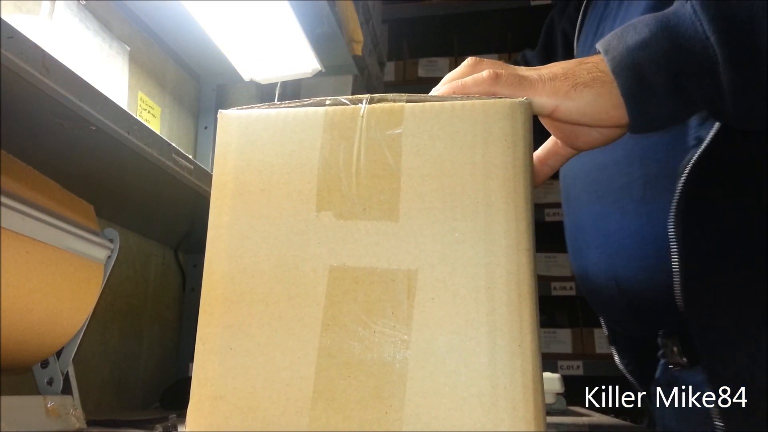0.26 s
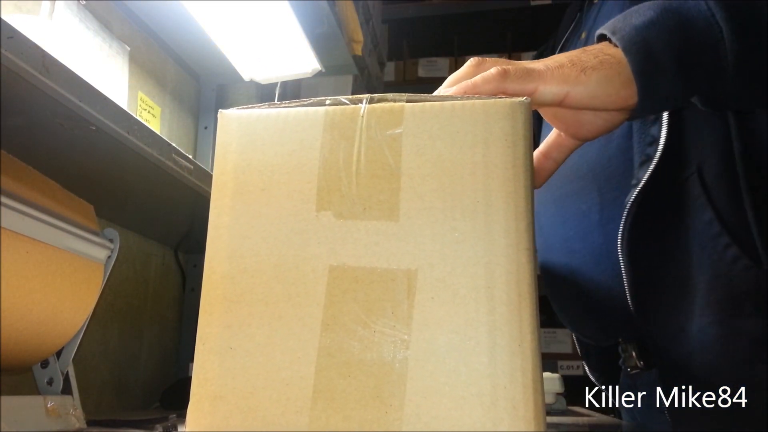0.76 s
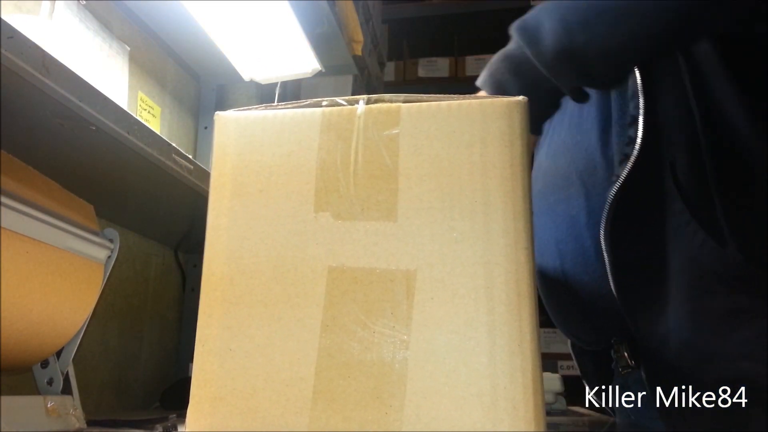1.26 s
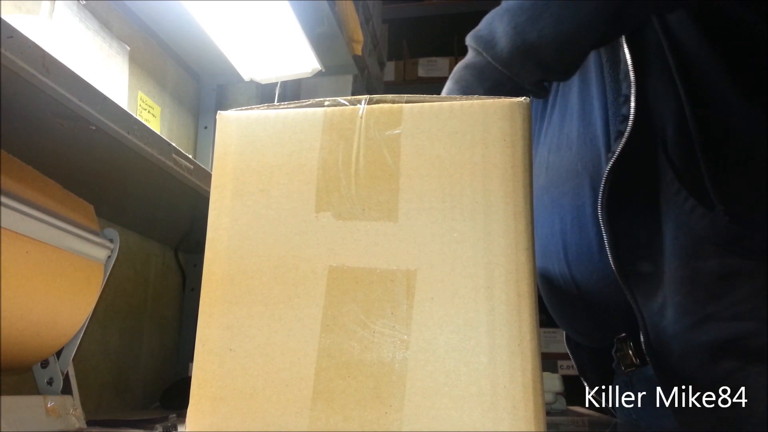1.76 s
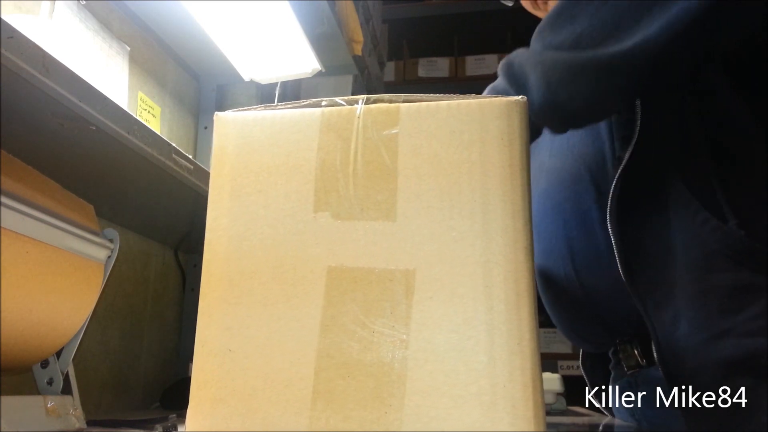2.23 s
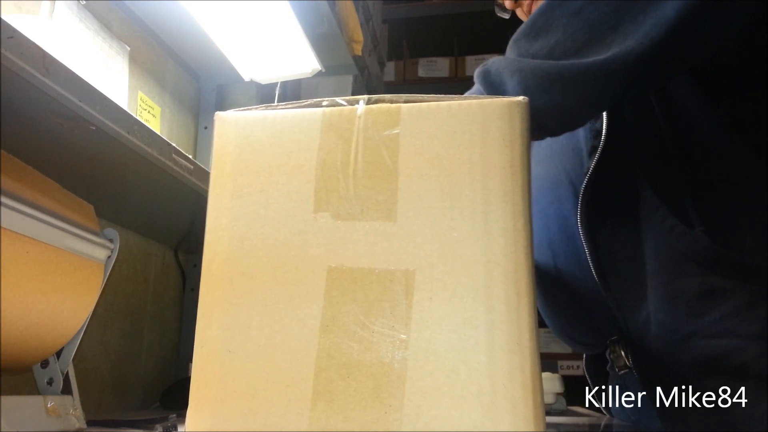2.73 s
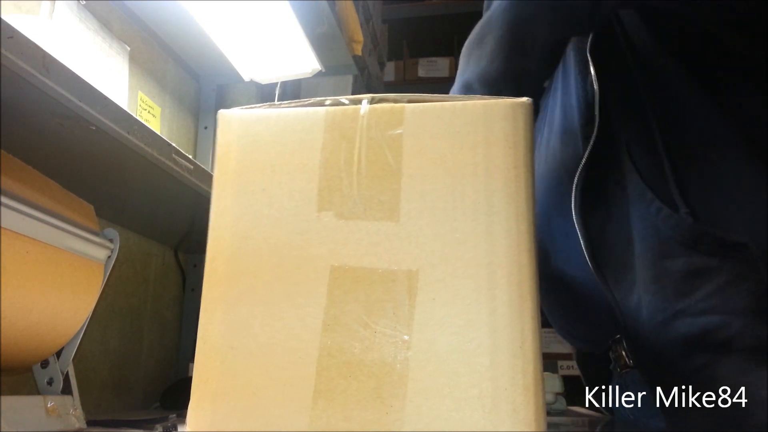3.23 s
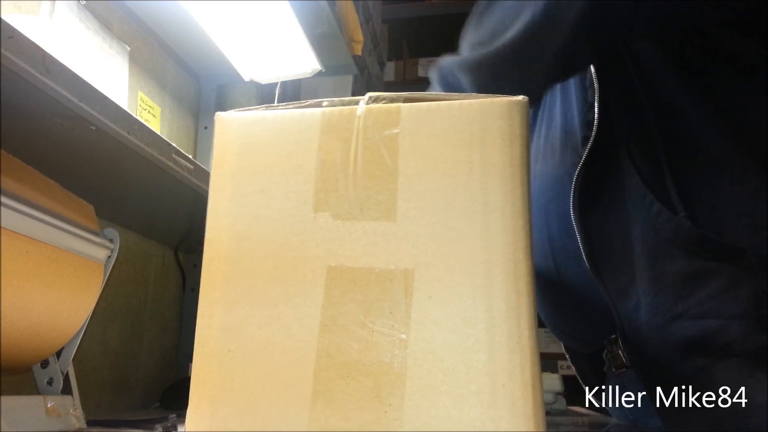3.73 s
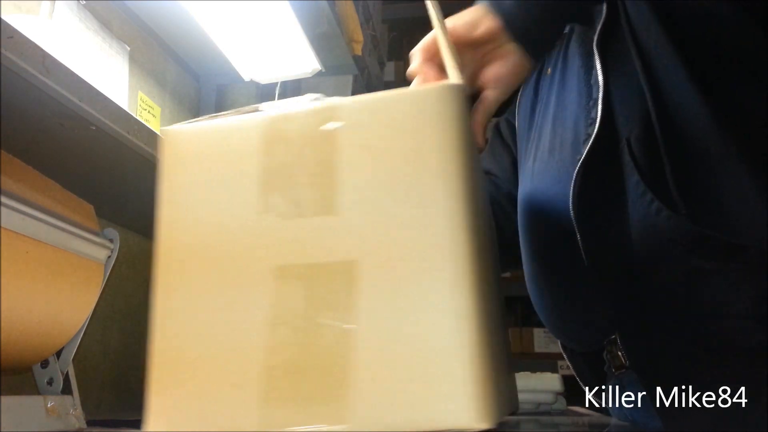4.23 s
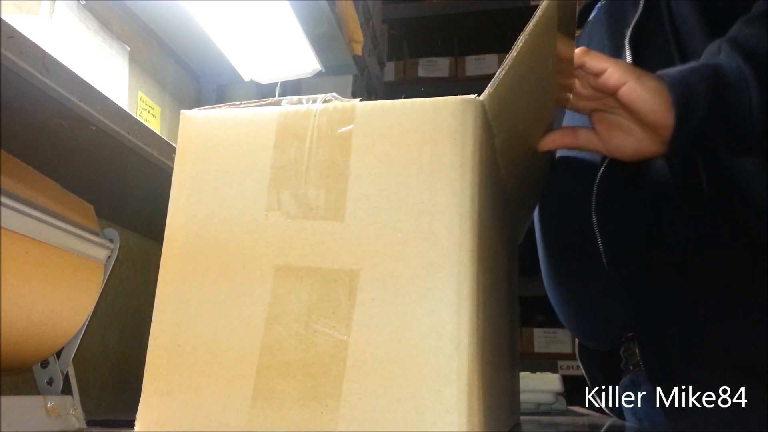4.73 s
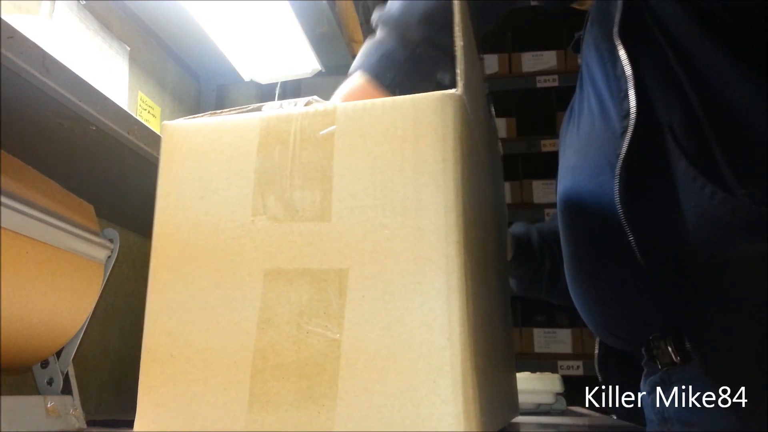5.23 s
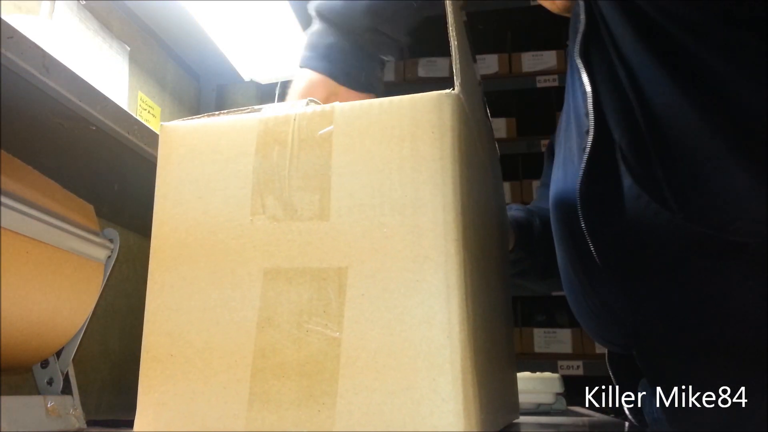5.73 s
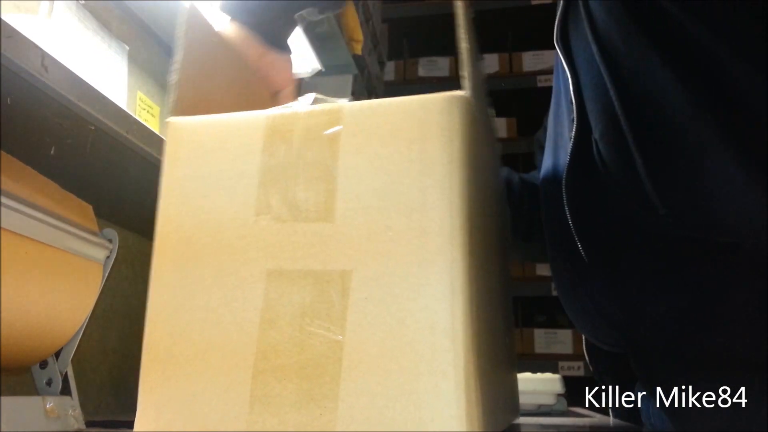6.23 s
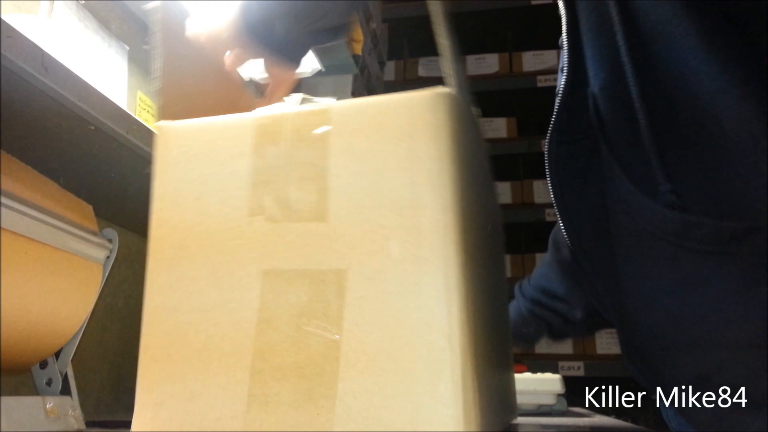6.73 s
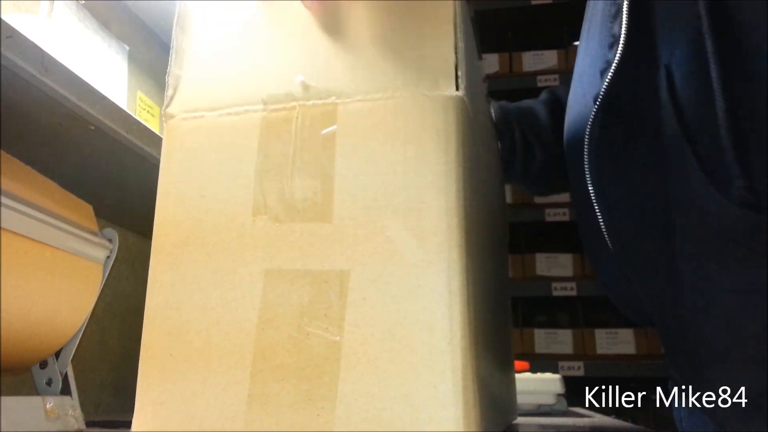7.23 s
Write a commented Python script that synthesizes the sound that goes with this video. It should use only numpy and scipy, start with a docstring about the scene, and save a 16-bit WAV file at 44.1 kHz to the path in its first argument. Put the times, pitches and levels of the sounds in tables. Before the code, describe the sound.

In a storeroom with faint air noise and low hum, very close to the microphone, a blade rasps along a taped carton seam from 0 to 1.1 seconds, fine and gritty, with a hollow drumming beneath and small catches on the corrugations. Short cuts and crackles follow at 1.4-2.2, a tiny squeak at 2.7, a sharp snap near 2.85, and a louder cluster of cracks at 3.4. A sleeve brushes the lid softly, with bumps and tape ticks. At 4.26 a flap bursts free with a loud hollow pop, then creaks and crinkles. Quieter rubbing and a brief knock lead to a second loud pop at 5.96. From 6.4 to 7.05 rubbing, thumps and dry cracks crowd together, with a briefly ringing tape snap at 6.86 and a heavy box knock at 7.0. From 7.2 to the end, jerky cardboard crunches honk and scrape harshly, the loudest peaks distorting, with a short room echo.

```python
"""A blade rasps along the taped seam of a cardboard carton and drums the hollow box beneath it.
The last bits of tape are then nicked and burst, a sleeve brushes the lid, and the flaps are pulled open
with cracks and scrapes that overload the microphone, in a storeroom with faint air noise and hum.
Rubbing is a random train of stick-slip releases, breaking is a decaying avalanche of them, and both
excite banks of resonances for box, flap, tape and film; filtered noise echoes form the room."""
import sys
import numpy as np
from scipy import signal
from scipy.fft import rfft, irfft
from scipy.io import wavfile
from scipy.ndimage import uniform_filter1d, map_coordinates

SR = 44100
rng = np.random.default_rng(int(sys.argv[2]) if len(sys.argv) > 2 else 0)


def master_out(mix):
    """Clip the mix to full scale and print it as 16-bit PCM to the path in sys.argv[1]."""
    frames = np.transpose(np.atleast_2d(mix))
    ceiling = np.clip(frames, -1, 1)
    pcm = np.round(ceiling * 32767).astype(np.int16)
    wavfile.write(sys.argv[1], SR, pcm)


N = 329868
EVENT_SIZE = 8192  # samples in one short event
TIME = np.arange(N) / SR
AGE = TIME[:EVENT_SIZE]  # seconds since the onset of an event

# Air and panel resonances of the carton. Each row: frequency in Hz, width in Hz, level in dB.
BOX = [(116.7, 12, -10), (164, 15, -7), (216, 25, -2.5), (248.5, 19.8, 3), (288.8, 43.6, 0),
       (419.7, 58.6, 2.5), (604.5, 65, -2), (706.5, 58.5, 0), (862, 102, -2), (1019, 139, -0.5),
       (1314, 130, -9.5)]
# Resonances of a free flap. Each row: frequency in Hz, width in Hz, level in dB.
FLAP_MODES = [(269, 150, -5.5), (416, 102, -2.5), (720, 115, 0.5), (866, 100, 2), (1027, 108, 0),
              (1760, 130, -15)]
# Spectrum of paper friction. Each row: frequency in Hz, level in dB.
PAPER = [(600, -22.5), (1400, -4.5), (2200, -2), (3200, -3), (4500, -3), (5500, -23), (8000, -33.5)]
# Spectrum of cracking board. Each row: frequency in Hz, level in dB.
CRACK = [(600, -8), (1400, -5.5), (1750, -10.5), (2100, 7), (2800, 10), (3500, -4), (4700, 0),
         (5600, -13.5), (8000, -48)]
# Spectrum of fine fibres. Each row: frequency in Hz, level in dB.
FIBRES = [(3000, -29.5), (4500, -4.5), (5400, 0.5), (7500, -1), (10000, -4.5), (14500, -6)]
# Short cuts of the blade. Each row: crest in seconds, rise and fall in seconds per 10 dB,
# box level in dB, rasp level in dB, treble over rasp in dB.
CUTS = [(1.46, 0.039, 0.16, -34, -38, -0.5), (1.76, 0.12, 0.16, -46, -47.5, 4),
        (2.125, 0.043, 0.05, -41.5, -37.5, 2), (2.705, 0.05, 0.056, -45, -46.5, -2),
        (2.85, 0.021, 0.066, -28, -30, 1.5), (2.99, 0.017, 0.055, -46.5, -45.5, 2),
        (3.21, 0.023, 0.048, -56, -57.5, -1), (3.36, 0.04, 0.033, -40, -43, 2.5),
        (3.44, 0.015, 0.031, -17.5, -20, 3)]
# Sleeve and hands sliding on the lid. Each row: crest in seconds, rise and fall in seconds per 10 dB,
# box level in dB, rasp level in dB, treble over rasp in dB.
RUBS = [(3.56, 0.039, 0.25, -44, -50, -15), (3.78, 0.05, 0.11, -40, -37, -0.5),
        (4.07, .17, 0.057, -37.5, -35, 2), (4.3, 0.04, 0.13, -27.5, -31, -1.5),
        (4.46, 0.085, 0.56, -39.5, -48, -4), (4.78, 0.085, 0.098, -46, -46.5, 1.5),
        (5.02, 0.13, 0.088, -48, -47.5, 5), (5.432, 0.034, 0.025, -27, -36, -3),
        (5.57, 0.059, 0.1, -42, -44.5, 0.5), (5.702, 0.016, 0.018, -21, -30, -6),
        (5.76, 0.044, 0.072, -41.5, -42.5, -2), (5.91, 0.039, 0.016, -41.5, -46.5, 4),
        (6.03, 0.059, 0.15, -33.5, -38.5, 4), (6.315, 0.097, 0.022, -31.5, -30, -1),
        (6.49, 0.1, 0.096, -35, -40, -8), (6.72, 0.11, 0.16, -29.5, -32, -5),
        (6.91, 0.089, 0.092, -22.5, -27, 2.5), (7.125, 0.019, 0.037, -34, -39.5, -3.5)]


def undb(db):
    """Level law: decibels to amplitude gain."""
    return 10 ** (np.asarray(db) / 20)


def unit(x):
    """Normalisation of mean power: scale to rms 1."""
    return x / np.sqrt(np.mean(x ** 2))


def burst(x, seconds):
    """Normalisation of energy: scale to the energy of rms 1 held for this long."""
    return unit(x) * np.sqrt(seconds * SR / x.shape[-1])


def pan(db):
    """Intensity stereo: channel gains for a left-minus-right level."""
    return undb(np.array([[db], [-db]]) / 2)


def add(out, s, x):
    """Superposition: mix x in from time s."""
    i = int(s * SR)
    out[:, i:i + x.shape[1]] += x[:, :N - i]


def colour(x, points, size=1024):
    """Minimum-phase filtering: a causal filter with the given (Hz, dB) response."""
    hz, db = np.transpose(points)
    grid_hz = np.arange(size + 1) * SR / 2 / size
    log_gain = np.log(undb(np.interp(np.log(grid_hz + 1), np.log(hz), db)))
    # folding the cepstrum onto positive time makes the filter causal
    folded = irfft(log_gain)[:size] * np.r_[1, np.full(size - 1, 2)]
    taps = irfft(np.exp(rfft(folded, 2 * size)))[:size]
    return signal.oaconvolve(x, taps[None], axes=1)[:, :x.shape[1]]


def cut(x, hz, kind, order=2):
    """Butterworth filtering: low- or high-pass."""
    sections = signal.butter(order, hz, kind, fs=SR, output="sos")
    return signal.sosfilt(sections, x + 1e-18)


def ring(x, modes):
    """Modal synthesis: a bank of (Hz, width in Hz, dB) resonances of alternating polarity."""
    out = 0
    for k, (hz, width, db) in enumerate(modes):
        mode = signal.lfilter(*signal.iirpeak(hz, hz / width, SR), x + 1e-18)
        out = out + (-1) ** k * undb(db) * mode
    return out


def walk(rate):
    """Band-limited fluctuation: a smooth random wander of rms 1 with this many steps per second."""
    k = int(SR / rate)
    stairs = np.repeat(rng.standard_normal(N // k + 1), k)
    return unit(uniform_filter1d(stairs, k)[:N])


def random_strengths(size, rate, spread_db):
    """Poisson-like impulses: random instants at a mean rate per second, of uneven strength."""
    happens = rng.random(size) < rate / SR
    return happens * undb(spread_db * np.minimum(rng.exponential(size=size), 4))


def slips(size, rate, spread_db):
    """Stick-slip: tiny uneven releases, each a short noise grain independent in the two channels."""
    strength = random_strengths(size, rate, spread_db)
    envelope = np.sqrt(np.abs(uniform_filter1d(strength ** 2, size=24)))
    return envelope * rng.standard_normal((2, size))


def drift(x, depth, rate):
    """Time warping: resonances slide up and down by a small share as the contact point moves."""
    place = np.arange(N) + np.cumsum(depth * walk(rate))
    return np.array([map_coordinates(channel, [place], mode="mirror") for channel in x])


def carton(force, modes, side=1.0, side_hz=900, pan_db=-4, low_hz=110, high_hz=1500):
    """Modal radiation: low modes reach both channels alike, high ones differ; deep bass radiates poorly."""
    difference = side * np.array([[1], [-1]]) * cut(force[1], side_hz, "high")
    panels = ring(force[0] + difference, modes)
    return pan(pan_db) * cut(cut(panels, low_hz, "high", order=3), high_hz, "low")


def friction(gains, body, rasp, hiss, judder):
    """Sliding contact: box drone, rasp and hiss share the same uneven pressure."""
    layers = sum(gain * unit(layer) for gain, layer in zip(gains, (body, rasp, hiss)))
    return unit(judder) * layers


def strokes(table, step=32):
    """Contact pressure: gains of box, rasp and hiss for strokes that swell to a crest and let go."""
    curve = 1.22  # 1 = pointed crest, 2 = round crest
    t, power = TIME[::step], 0
    for crest, rise, fall, box_db, rasp_db, treble_db in table:
        away = np.clip(np.maximum((crest - t) / rise, (t - crest) / fall), 0, 20)
        crest_db = np.array([[box_db], [rasp_db], [rasp_db + treble_db]])
        power = power + undb(crest_db - 10 * away ** curve) ** 2
    return np.array([np.interp(TIME, t, gain) for gain in np.sqrt(power)])


def long_pull(release_db_per_s=220):
    """Contact pressure: gains of box, rasp and hiss while the blade runs down the seam and leaves it."""
    # Each row: time in seconds, box level in dB, rasp level in dB, treble over rasp in dB.
    pull = [(0, -35.5, -38, 0.5), (.42, -35, -39, 2), (.5, -38, -42.5, 2.5), (.63, -37, -39.5, 2),
            (.79, -37.5, -40.5, 0.5), (.88, -38, -37.5, -2.5), (1.03, -35.5, -31.5, -2), (1.1, -53, -54, 7)]
    s, box_db, rasp_db, treble_db = np.transpose(pull)
    release_db = release_db_per_s * np.maximum(TIME - s[-1], 0)
    return undb([np.interp(TIME, s, db) - release_db for db in (box_db, rasp_db, rasp_db + treble_db)])


def ambience(level_db=-58.5):
    """Broadband air noise: faint ventilation, alike in both channels in the bass."""
    # Each row: frequency in Hz, relative spectral density in dB per Hz.
    air_colour = [(35, -34), (110, -3.5), (480, -3), (1000, -10), (1500, -16), (6000, -25.5), (14500, -22)]
    air = rng.standard_normal(N) + cut(rng.standard_normal((2, N)), 700, "high", order=1)
    return undb(level_db) * unit(colour(air, air_colour))


def hum():
    """Periodic excitation: the faint hum of lamps and fans as steady sine tones."""
    # Each row: frequency in Hz, rms level in dB.
    tones = [(120, -73.5), (482, -69), (715, -74)]
    return sum(undb(db) * np.sqrt(2) * np.sin(2 * np.pi * (hz * TIME + rng.random())) for hz, db in tones)


def room(x, early_db=-11, early_t60=0.11, late_db=-14, low_t60=0.42, high_t60=0.58, split_hz=2500):
    """Reverberation: quick reflections off the shelves, then a tail that decays exponentially."""
    # What shelves and walls return. Each row: frequency in Hz, level in dB.
    wall_colour = [(40, -23), (110, -3.5), (250, 1), (700, -1), (2000, -3), (5000, -2), (14000, -0.5)]
    t = TIME[:SR]
    onset = np.clip((t - .003) / 0.0037, 0, 1)
    near, far = rng.standard_normal((2, 2, SR)) * onset
    early = near * undb(-60 * t / early_t60)
    late_low = cut(far, split_hz, "low", order=1) * undb(-60 * t / low_t60)
    late_high = cut(far, split_hz, "high", order=1) * undb(-60 * t / high_t60)
    echoes = undb(early_db) * burst(early, 1 / SR) + undb(late_db) * burst(late_low + late_high, 1 / SR)
    return signal.fftconvolve(x, colour(echoes, wall_colour), axes=1)[:, :N]


def sleeve():
    """Dry friction: cloth and skin glide with a smooth hiss while the bending board creaks in fits."""
    fits = undb(1.6 * walk(45))
    drone = carton(slips(N, rate=1300, spread_db=3.0), BOX, pan_db=-4.0, low_hz=100, high_hz=1250)
    body = drift(drone, depth=.03, rate=8) * fits
    rasp = pan(-2) * colour(slips(N, rate=2300, spread_db=-0.5), PAPER)
    hiss = colour(rng.standard_normal((2, N)), FIBRES)
    return friction(strokes(RUBS), body, rasp, hiss, undb(1.9 * walk(60)))


def thud(envelope, seconds, tone_hz, sharpness=1.26):
    """Impact: the stiffness of the contact picks which box resonances speak."""
    blow = envelope * rng.standard_normal((2, EVENT_SIZE))
    force = ring(blow, [(tone_hz, tone_hz / sharpness, 0)])
    return burst(carton(force, BOX, pan_db=-5.5, low_hz=99), seconds)


def bumps(scuff=0.68, struck=0.46):
    """Soft impact: hand or flap swings the touched panel for a few cycles and scuffs the rest of the box."""
    # Each row: start in seconds, swell time in seconds, level in dB before the scuff and struck shares,
    # box tone in Hz.
    soft_contacts = [(1.438, 0.0071, -22, 890), (1.912, 0.0051, -25, 910), (3.001, 0.0058, -30.5, 880),
                     (3.472, .002, -5.5, 577), (3.755, 0.019, -32.5, 596), (3.871, .0048, -22.5, 690),
                     (4.635, 0.0073, -17.5, 320), (5.42, .012, -24, 330), (6.086, 0.0087, -15.5, 303),
                     (6.523, 0.0045, -16, 436), (6.664, 0.0044, -6, 327), (6.732, 0.003, -11.5, 730),
                     (6.996, .0033, 0, 340)]
    out = np.zeros((2, N))
    for s, swell, box_db, tone_hz in soft_contacts:
        envelope = (AGE / swell) ** 2 * np.exp(-2.8 * AGE / swell)
        tone = cut(envelope * np.sin(2 * np.pi * tone_hz * AGE), tone_hz / 2, "high")
        swing = pan(-3.5) * burst(tone, swell)
        # a brief knock is a clean swing, a long contact mostly scuff
        clean = min(1, (2 / (swell * tone_hz)) ** 2)
        rubbed = scuff * (1 - 0.55 * clean) * thud(envelope, swell, tone_hz, sharpness=1.0)
        add(out, s, undb(box_db) * (struck * clean * swing + rubbed))
    return out


def crinkles(rate=70, spread_db=3.0, decay=0.0016, level_db=-9.0, treble_db=-7, box_db=-8):
    """Random impulses: grit and tape ends crackle and tap the box, following blade and hand pressure."""
    drum, pressure, _ = strokes([*CUTS, *RUBS]) + long_pull()
    strength = random_strengths(N, rate, spread_db)
    energy = signal.lfilter([1], [1, -np.exp(-2 / (decay * SR))], strength ** 2 + 1e-18)
    flicks = np.sqrt(energy) * rng.standard_normal((2, N))
    crackle = pan(-2) * (unit(colour(flicks, CRACK)) + undb(treble_db) * unit(colour(flicks, FIBRES)))
    return undb(level_db) * pressure * crackle + undb(box_db) * drum * unit(carton(flicks, BOX))


def crack(envelope, seconds, treble_db, rate, pan_db, own_db=-1, own_width_hz=130,
          low_hz=1500, high_hz=4600, count=4):
    """Fracture avalanche: fibres break at a mean rate per second; each piece adds random resonances."""
    fibres = envelope * slips(EVENT_SIZE, rate, spread_db=1)
    # one resonance falls at random in each of equal musical intervals
    own_hz = low_hz * (high_hz / low_hz) ** ((np.arange(count) + rng.random(count)) / count)
    own = ring(fibres, [(hz, own_width_hz, 0) for hz in own_hz])
    piece = unit(colour(fibres, CRACK)) + undb(own_db) * unit(own)
    treble = burst(colour(fibres, FIBRES), seconds)
    return pan(pan_db) * (burst(piece, seconds) + undb(treble_db) * treble)


def ticks(decay=0.0028, seconds=0.0019, flick=0.6, flick_decay=0.0006, film_q=7):
    """Buckling: stiff tape film snaps over with a crinkle and a sharp flick that rings at its own pitch."""
    # Each row: start in seconds, crack level in dB, treble over crack in dB, ring of the film in Hz.
    buckles = [(1.157, -39, -2.5, 4500), (1.488, -24.5, -9, 4200), (1.852, -34, -.5, 5500),
               (2.575, -46.5, -7, 4000), (2.788, -34.5, -5, 4000), (3.538, -18.5, -18, 2740),
               (3.632, -28.5, -10.5, 4000), (4.316, -22, 7, 7030), (4.331, -15.5, 0, 3750),
               (4.344, -24.5, 6, 6690), (4.456, -31.5, 3, 5700), (4.658, -34, 8.5, 5700),
               (4.753, -36.5, 2, 4200), (5.505, -49, 16, 6300), (5.554, -26, 8, 12500),
               (5.608, -24, -9, 2400), (5.792, -34.5, 6.5, 7100), (5.889, -42.5, 6.5, 6500),
               (6.431, -20, 7, 12500), (6.543, -28, 8, 5600), (6.718, -20.5, 11, 6800),
               (6.837, -22, 3, 6500), (7.032, -23.5, 5, 5800)]
    out = np.zeros((2, N))
    for s, crack_db, treble_db, film_hz in buckles:
        push = AGE / flick_decay * np.exp(-AGE / flick_decay) * rng.standard_normal((2, EVENT_SIZE))
        film = ring(push, [(film_hz, film_hz / film_q, 0)])
        fade = np.exp(-AGE / decay) * np.tanh(AGE / flick_decay)
        crinkle = crack(fade, seconds, treble_db, rate=10200, pan_db=-5.0)
        sharp = flick * undb(treble_db) * pan(-8.5) * burst(film, seconds)
        add(out, s, undb(crack_db) * (crinkle + sharp))
    return out


def snap(decay, box_db, tone_hz, crack_db, treble_db, rise=0.24, box_rise=0.069, box_hold=0.72,
         board_db=-7, board_hz=950):
    """Sudden fracture: fibres break, the panels swing, and the broken board answers with a dry clack."""
    age = AGE / decay  # rise, box_rise and box_hold are shares of the decay time
    fade = np.exp(-age) * np.tanh(age / rise)
    fibres = crack(fade, decay, treble_db, rate=11400, pan_db=-3.0)
    panels = thud(np.exp(-age / box_hold) * np.tanh(age / box_rise), decay, tone_hz)
    board = ring(fade * rng.standard_normal((2, EVENT_SIZE)), [(board_hz, 350, 0)])
    clack = burst(cut(board, 2100, "low"), decay)
    return undb(crack_db) * fibres + undb(box_db) * (panels + undb(board_db) * clack)


def small_cracks(table, decay, tone_hz, treble_db, rise):
    """Local fracture: each place that gives way drums the box and cracks a little."""
    out = np.zeros((2, N))
    for s, box_db, crack_db in table:
        add(out, s, snap(decay, box_db, tone_hz, crack_db, treble_db, rise=rise, box_rise=rise / 2))
    return out


def creaks():
    """Stick-slip in bending: the fold of the lifted flap gives way in small cracks."""
    # Each row: start in seconds, box level in dB, crack level in dB.
    fold_cracks = [(4.379, -32, -24.5), (4.453, -26.5, -38), (4.496, -41, -36), (4.529, -36, -40),
                   (4.562, -32, -47), (4.636, -39, -35.5), (5.684, -24, -26)]
    return small_cracks(fold_cracks, decay=0.0038, tone_hz=795, treble_db=-5, rise=.25)


def twang(start_s=6.864, decay_s=0.0071, level_db=-7.5):
    """Free vibration: the creased flap rings briefly as it snaps."""
    # Each row: frequency in Hz, width in Hz, level in dB.
    crease_modes = [(1666, 40, 2), (2225, 49, -2), (2746, 59, -3), (4050, 120, -13)]
    force = np.exp(-AGE / decay_s) * rng.standard_normal((2, EVENT_SIZE))
    out = np.zeros((2, N))
    add(out, start_s, undb(level_db) * pan(-2.2) * burst(ring(force, crease_modes), decay_s))
    return out


def puff(decay, top_hz=80):
    """Volume displacement: air pushed out of the jolted carton, as low-passed noise."""
    air = np.exp(-AGE / decay) * rng.standard_normal(EVENT_SIZE)
    return pan(0) * burst(cut(air, top_hz, "low"), decay)


def pops(decay=0.009, tone_hz=367, treble_db=-6.5):
    """Sudden release: a flap tears free of its last tape, wakes the deep resonances and puffs out air."""
    # Each row: start in seconds, box level in dB, crack level in dB, puff of air in dB.
    releases = [(4.258, -.5, -4, -26), (5.964, 1, -4, -15)]
    out = np.zeros((2, N))
    for s, box_db, crack_db, air_db in releases:
        tear = snap(decay, box_db, tone_hz, crack_db, treble_db, rise=0.12, board_db=-2.5)
        add(out, s, tear + undb(air_db) * puff(decay))
    return out


def snaps():
    """Sudden fracture: tape and board give way in single cracks, each with a clack of its own pitch."""
    # Each row: start in seconds, decay in seconds, box level in dB, crack level in dB,
    # treble over crack in dB, clack of the board in Hz.
    breaks = [(1.046, 0.013, -25, -25.5, -0.5, 1040), (1.088, .0098, -60, -29.5, 2, 950),
              (1.359, 0.0062, -40, -46.5, -11, 700), (1.921, .007, -32.5, -30, -1.5, 910),
              (1.939, .0082, -35, -35, 1, 900), (2.823, 0.0074, -15, -14.5, -6.5, 930),
              (2.845, 0.012, -23.5, -31, -1, 450), (2.874, 0.0094, -22.5, -23.5, -1, 660),
              (3.379, 0.0093, -23, -23, 4, 657), (3.419, .008, -21.5, -24, 1, 800),
              (3.434, 0.0069, -11, -10.5, -1.5, 450), (3.451, 0.0062, -9, -12.5, 2, 1070),
              (4.25, 0.0057, -16, -20.5, 3.5, 960), (4.711, .0037, -21, -35, -7, 596),
              (5.348, 0.011, -38.5, -41, -4.5, 950), (6.58, 0.0056, -14.5, -20.5, -2.5, 945),
              (6.685, 0.0097, -17, -20, -20, 1000), (6.759, 0.0064, -13, -12, -3, 770),
              (6.863, .0077, -8.5, -13.5, -3.5, 684), (7.018, 0.011, -18.5, -19, -17, 1000)]
    out = np.zeros((2, N))
    for s, decay, box_db, crack_db, treble_db, clack_hz in breaks:
        # a crack drives the panels most around 700 Hz
        add(out, s, snap(decay, box_db, 700, crack_db, treble_db, board_db=-4, board_hz=clack_hz))
    return out


def flap():
    """Sliding friction: a corrugated edge rubs the next flap and makes the free panel honk."""
    # Sliding between jerks. Each row: crest in seconds, rise and fall in seconds per 10 dB,
    # flap level in dB, rasp level in dB, treble over rasp in dB.
    slides = [(7.27, 0.043, 0.24, -26, -24.5, 5), (7.378, 0.034, 0.12, -20, -23, -11)]
    grain = slips(N, rate=6000, spread_db=1.2)
    panel_force = slips(N, rate=1800, spread_db=-0.5)
    body = carton(panel_force, FLAP_MODES, side=0.19, pan_db=-6.5, high_hz=880)
    rasp = pan(-1.3) * colour(grain, PAPER)
    hiss = pan(-4.0) * colour(grain, FIBRES)
    return friction(strokes(slides), body, rasp, hiss, undb(1.3 * walk(200)))


def crunches(rise=0.00069, squareness=5, low_hz=380, pan_db=-3.5):
    """Stick-slip jerks: short runs of slips start and stop abruptly and drive the free panel hard."""
    # Each row: start in seconds, length in seconds, flap level in dB, rasp level in dB,
    # treble over rasp in dB.
    jerks = [(7.183, 0.022, -17.5, -20.5, 2.5), (7.201, 0.011, -5, -11, -3), (7.213, 0.014, -7, -14.5, -2),
             (7.232, 0.021, -6, -14.5, -1.5), (7.26, 0.0074, -14, -20, -2), (7.29, 0.0077, -12, -17.5, 6),
             (7.313, 0.0075, -9, -20.5, 10), (7.333, .015, -13.5, -23, 13), (7.352, 0.015, -15, -23, 10.5),
             (7.46, 0.03, -14, -19, -1.5)]
    out = np.zeros((2, N))
    for s, length, flap_db, rasp_db, treble_db in jerks:
        grain = slips(EVENT_SIZE, rate=6000, spread_db=1.2)
        force = np.tanh(AGE / rise) * np.exp(-(AGE / length) ** squareness) * grain
        panel = burst(carton(force, FLAP_MODES, side=.3, low_hz=low_hz), length)
        edge = burst(colour(force, PAPER), length) + undb(treble_db) * burst(colour(force, FIBRES), length)
        add(out, s, undb(flap_db) * panel + undb(rasp_db) * pan(pan_db) * edge)
    return out


def squeak(centre_s=2.703, swell_s=0.016, level_db=-35):
    """Fast stick-slip: steel on film squeaks once, swelling and dying in a few narrow resonances."""
    # Each row: frequency in Hz, width in Hz, level in dB.
    squeak_modes = [(2420, 200, -3), (2740, 100, 4), (3090, 180, -6), (4130, 220, -8), (5450, 250, -15)]
    swell = np.exp(-((TIME - centre_s) / swell_s) ** 2 / 2)
    tone = unit(ring(slips(N, rate=2500, spread_db=2.0), squeak_modes))
    return undb(level_db) * swell * pan(-2) * tone


def flute_catches():
    """Local fracture: the blade catches on the flutes of the board."""
    # Each row: start in seconds, box level in dB, crack level in dB.
    caught_flutes = [(.428, -30.5, -42), (.625, -29, -33), (.722, -42, -38), (.822, -29, -31.5),
                     (.856, -28, -42), (.877, -28, -33), (1.46, -14, -27), (1.512, -27, -31.5),
                     (1.537, -25, -39), (1.557, -19.5, -28.5), (1.575, -37, -30.5), (1.596, -28, -44),
                     (1.613, -28.5, -38), (1.651, -26.5, -33.5), (1.701, -27.5, -32), (1.774, -39, -36.5),
                     (2.151, -45, -26.5), (2.163, -50, -37)]
    return small_cracks(caught_flutes, decay=0.0064, tone_hz=393, treble_db=-7.5, rise=0.71)


def knife(rim_s=0.36, rim_width_s=0.23, soft_hz=520):
    """Stick-slip cutting: tape parts in thousands of small tears and the blade catches on flutes below."""
    # Resonances of taut tape and blade. Each row: frequency in Hz, width in Hz, level in dB.
    tape_modes = [(1577, 150, 0.5), (2274, 210, 3), (2745, 66, 6.5), (3185, 170, 2.5)]
    # The steel edge singing through the film. Each row: frequency in Hz, level in dB.
    edge_colour = [(2500, -34.5), (3900, 5), (4600, 3.5), (5600, -1.5), (9500, -3.5), (14500, -10)]
    tears = slips(N, rate=1600, spread_db=3)
    catches = slips(N, rate=3000, spread_db=1.4)
    # the slack middle of the lid drums low; the stiff rim passes sharper catches
    rim = (1 + np.tanh((TIME - rim_s) / rim_width_s)) / 2
    slack_force = unit(cut(catches, soft_hz, "low", order=1))
    rim_force = unit(cut(catches, 2 * soft_hz, "low", order=1))
    force = (1 - rim) * slack_force + rim * rim_force
    body = drift(carton(force, BOX, pan_db=-5.0, low_hz=146, high_hz=2200), depth=.025, rate=10)
    rasp = pan(-2.3) * drift(cut(ring(tears, tape_modes), 6600, "low"), depth=.03, rate=10)
    hiss = pan(-3) * colour(slips(N, rate=4000, spread_db=-1.0), edge_colour)
    return friction(long_pull() + strokes(CUTS), body, rasp, hiss, undb(0.93 * walk(80)))


def scene():
    """Superposition: all the work on the carton, heard in the room."""
    cutting = knife() + flute_catches() + squeak()
    opening = flap() + crunches() + creaks() + twang() + pops()
    work = cutting + opening + sleeve() + snaps() + bumps() + ticks() + crinkles()
    return work + room(work) + ambience() + hum()


def record(dry, top_hz=14550):
    """Overload and band limit: the microphone clips the loudest peaks, then a steep low-pass cuts the top."""
    clipped = np.clip(dry, -1, 1)
    low_pass = signal.ellip(8, .05, 50, top_hz, fs=SR, output="sos")
    return signal.sosfiltfilt(low_pass, clipped)  # forwards and backwards: no phase shift


dry = scene()
out = record(dry)
master_out(out)
```